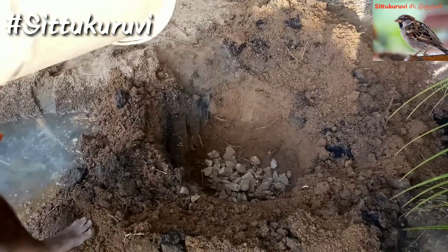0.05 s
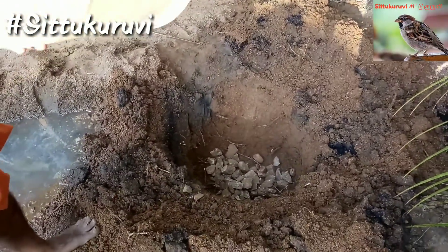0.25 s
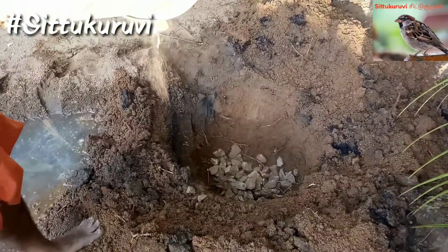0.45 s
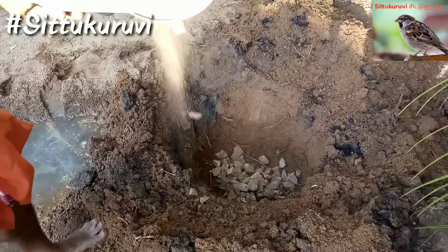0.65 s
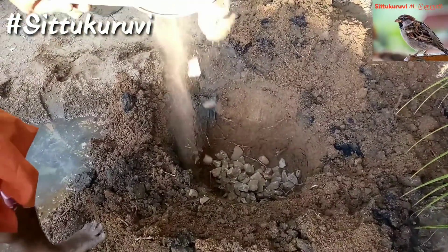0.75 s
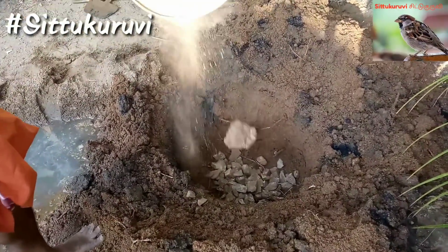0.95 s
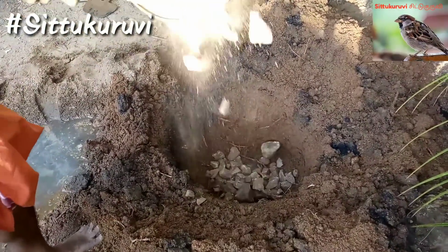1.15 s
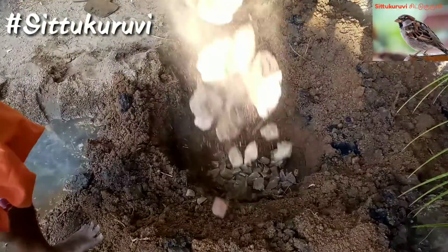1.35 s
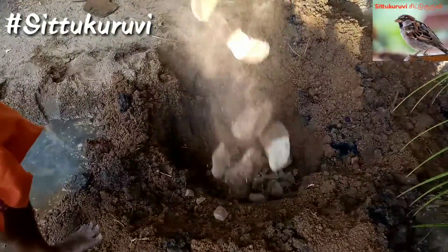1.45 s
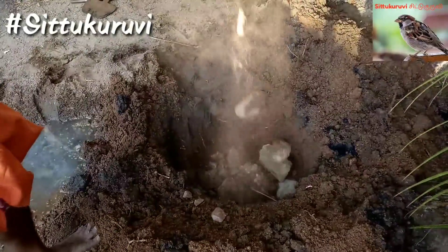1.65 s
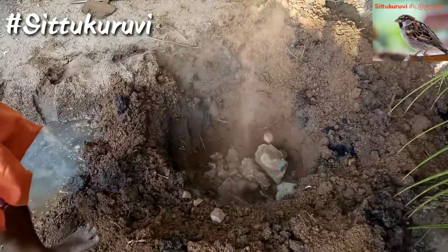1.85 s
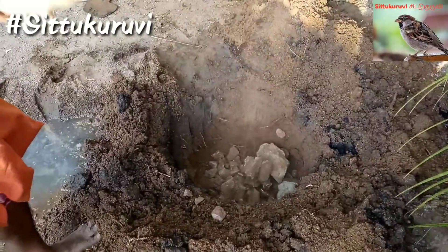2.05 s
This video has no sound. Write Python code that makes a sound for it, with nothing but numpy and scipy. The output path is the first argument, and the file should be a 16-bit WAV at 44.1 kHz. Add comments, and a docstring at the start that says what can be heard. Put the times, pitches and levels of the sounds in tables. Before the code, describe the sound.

Rocks tumble loudly from a hollow plastic tub into an earth pit, ending in settling knocks

```python
"""Under a faint outdoor background, broken stones begin to slip in a tipped plastic tub, with soft scrapes.
They slide out in two surges: random contacts make them clatter, grit crackles as short noise bursts,
and rolling stones rumble. Knocks and thumps are short swelling tones that ring the tub's wall.
The last stones land on a heap in an earth pit with dry clacks, a few thuds, and settle.
Noise that dies away serves as the echo of the pit and the open air."""
import sys
import numpy as np
from scipy import signal
from scipy.fft import rfft, irfft
from scipy.io import wavfile
from scipy.ndimage import uniform_filter1d

SR = 44100
rng = np.random.default_rng(int(sys.argv[2]) if len(sys.argv) > 2 else 0)


def wrap_up_sound(samples):
    """Save the sound to the file named by the first command line argument, as 16-bit audio."""
    columns = np.atleast_2d(samples).T
    # keep every value between -1 and 1, then stretch to whole-number steps
    tamed = np.clip(columns, -1, 1)
    steps = np.round(tamed * 32767).astype(np.int16)
    wavfile.write(sys.argv[1], SR, steps)


N = 92610  # length [samples], 2.1 s

# Tone colour of the background: (frequency [Hz], level per Hz [dB])
OUTDOORS_COLOUR = [(25, -1), (70, 5), (130, 4), (220, -8), (450, 0), (1300, -4), (2500, -14), (5000, -27.5),
                   (8000, -29), (8500, -29), (9000, -31), (16000, -50)]
# Sliding load, levels before the trims below:
# (time [s], clatter level [dB], grit level [dB], rumble level [dB])
SLIDE_LEVELS = [(0.1, -50.5, -84, -39), (0.144, -51.5, -76, -39), (0.222, -32.5, -55, -39.5),
                (0.252, -27, -49, -28.5), (0.306, -30, -51, -29), (0.334, -23.5, -27, -28.5),
                (0.372, -21.5, -41.5, -12.5), (0.392, -28.5, -42, -30), (0.408, -18, -44, -23),
                (0.454, -29, -38.5, -29.5), (0.474, -19, -24, -19), (0.52, -16, -38, -23.5),
                (0.54, -13, -26, -18.5), (0.552, -23, -35, -27.5), (0.61, -16.5, -34, -22),
                (0.878, -32, -52.5, -30.5), (0.894, -22.5, -40, -17), (0.912, -22.5, -34, -25),
                (0.956, -24, -35, -27.5), (1.002, -18.5, -35, -22), (1.298, -18.5, -29, -21),
                (1.32, -26.5, -42.5, -20), (1.352, -19, -26, -27.5), (1.376, -21, -51, -29),
                (1.386, -19, -34.5, -22), (1.5, -27, -38, -34.5), (1.542, -22, -37.5, -35.5),
                (1.58, -42, -60.5, -46)]
# Tones of the tub's plastic wall: (frequency [Hz], time to fall 60 dB [s], relative level [dB])
TUB_MODES = [(235.4, 0.21, -2), (380, 0.13, -8), (678, 0.032, -9), (782, 0.03, -6), (1216, 0.048, 2),
             (1315.5, 0.036, 1.5), (1413, 0.23, -4), (1548, 0.052, -3.5), (1615, 0.041, -1),
             (1770, .06, -10), (2010, 0.02, 2), (2580, 0.052, -5), (2850, 0.07, -32)]
# Tone colours of the three sliding sounds: (frequency [Hz], level per Hz [dB])
CLATTER_COLOUR = [(150, -7), (350, -1.5), (700, 0), (1000, 1.5), (1350, -2), (2050, -2.5), (2600, -7),
                  (3500, -12.5), (7000, -11)]
GRIT_COLOUR = [(1000, -21), (2500, 8.5), (4000, 0.5), (6300, -1), (8500, -9.5), (11000, -11), (14000, -26),
               (16000, -34)]
RUMBLE_COLOUR = [(25, -29), (65, -6), (150, -9), (230, -0.5), (310, -3), (420, 0.5), (700, -7.5),
                 (2000, -46)]
# Big stones striking inside the tub: (time [s], level [dB], pitch [Hz], crack level before trim [dB])
KNOCKS = [(.046, -28.5, 1125, -52), (.050, -29, 705, -45.5), (0.213, -22, 1210, -36), (.253, -18, 720, -50),
          (.318, -21, 1980, -18), (0.336, -14.5, 1230, -12), (.340, -21, 1870, -37), (.406, -8, 1350, -27),
          (0.427, -14, 1380, -20.5), (0.429, -10.5, 1090, -21), (.443, -29, 1800, -22),
          (.467, -15, 1680, -17), (0.479, -6.5, 1560, -11.5), (.490, -12, 1600, -22),
          (0.496, -18, 1560, -13.5), (0.534, -19, 1190, -19), (0.54, -20, 1480, -14),
          (0.595, -8.5, 1680, -9.5), (0.612, -10.5, 1250, -22), (.641, -14, 1700, -10.5),
          (.681, -11.5, 1470, -18), (0.699, -12.5, 1090, -15), (0.728, -12, 608, -26),
          (0.75, -19, 2180, -20.5), (0.774, -33, 1770, -20), (.822, -17.5, 875, -41),
          (.892, -12.5, 1000, -15.5), (0.903, -16, 890, -20.5), (.942, -16.5, 4750, -13.5),
          (.962, -13, 1870, -34), (0.987, -9, 1690, -11.5), (1.005, -8, 740, -31),
          (1.053, -23, 1400, -14.5), (1.081, -17, 1350, -16.5), (1.115, -10, 1290, -39),
          (1.120, -5, 655, -28), (1.151, -7.5, 1380, -13.5), (1.156, -6, 1910, -16),
          (1.222, -20, 1290, -15), (1.253, -14, 1000, -15), (1.264, -13, 1500, -17),
          (1.276, -10.5, 1440, -25), (1.291, -14, 1300, -25), (1.330, -12, 1200, -28),
          (1.346, -20, 1430, -14), (1.379, -15, 1200, -23), (1.393, -9, 1380, -22),
          (1.466, -14.5, 1310, -25), (1.493, -22, 1400, -22), (1.518, -11.5, 1300, -21.5),
          (1.54, -14.5, 1300, -24)]
# Tone colour of the cracks in the tub: (frequency [Hz], level per Hz [dB])
TUB_CRACK_COLOUR = [(80, -38), (400, -9.5), (1200, 8.5), (2300, 10), (2900, 1.5), (3600, -2.5),
                    (6000, -8.5), (9000, -9), (12000, -18.5), (16000, -24)]
# Heavy stones rolling over and thumping the tub's bottom: (time [s], level [dB], pitch [Hz])
THUMPS = [(0.051, -32, 267), (.252, -15.5, 370), (.263, -18, 370), (0.318, -23, 285), (.363, -10, 307),
          (.411, -29, 130), (0.552, -18, 238), (0.563, -22.5, 140), (0.733, -13.5, 403), (0.821, -22, 225),
          (0.903, -14, 332), (1.001, -16.5, 256), (1.078, -17.5, 212), (1.121, -22, 278),
          (1.200, -19.5, 200), (1.275, -21, 220), (1.344, -14.5, 233), (1.357, -19, 234), (1.398, -20, 230)]
# Short scrapes on the plastic as the load starts to slip: (time [s], level [dB])
SCRAPES = [(.121, -30.5), (.148, -30), (.160, -31), (.176, -35.5)]
# Stones landing on the heap:
# (time [s], level [dB], pitch [Hz], swell to the peak [cycles], crack level before trim [dB])
LANDINGS = [(1.5875, -15, 1330, 1.2, -13.5), (1.59, -21, 1330, 2.4, -15.5), (1.637, -19.5, 1280, 3, -26),
            (1.643, -12, 1330, 1, -29), (1.644, -19.5, 484, 1.16, -30), (1.651, -27, 1100, 1.6, -22),
            (1.666, -13.5, 1213, 1.7, -20.5), (1.681, -7, 1150, 0.8, -26), (1.682, -17.5, 830, 1.5, -30),
            (1.692, -13, 1210, 1.4, -25.5), (1.701, -15, 890, 0.79, -26), (1.707, -19, 1330, 0.69, -21.5),
            (1.716, -12.5, 880, 0.53, -29), (1.742, -8.5, 960, 0.51, -46), (1.747, -14, 530, 0.68, -37),
            (1.756, -16, 640, 0.5, -42), (1.794, -25, 1050, 0.59, -47), (1.8227, -4.5, 702, 0.97, -31),
            (1.827, -19, 810, 1.2, -41), (1.838, -42, 756, 0.81, -36), (1.864, -52, 3800, 2.3, -43),
            (1.9026, -16.5, 833, 0.7, -27.5), (1.981, -16.5, 940, 0.65, -62),
            (2.0137, -21, 1490, 1.95, -38), (2.034, -18.5, 1150, 0.92, -30.5)]
# Tone colour of the cracks on the heap: (frequency [Hz], level per Hz [dB])
HEAP_CRACK_COLOUR = [(300, -8.5), (1400, 8.5), (1900, 11), (2350, -2), (3200, 1.5), (4400, -2.5),
                     (5500, -11), (7500, -11.5), (8600, -23), (9800, -14), (12500, -34), (16000, -40)]
# Dull thuds of the earth under some landings: (time [s], level [dB])
THUDS = [(1.643, -22), (1.715, -23.5), (1.746, -41), (1.825, -49)]

# T60 is the time a sound takes to fall by 60 dB; CYCLES is the time to the peak of a blow.
OUTDOORS_DB = -51
CLATTER_TRIM_DB, GRIT_TRIM_DB, RUMBLE_TRIM_DB = 0.5, 0.5, -4
ONSET_DB_PER_S, RUN_OUT_DB_PER_S = 32, 83  # slopes before the first and after the last table row
CONTACTS_PER_S = 1600  # nominal; the random gaps come out slightly shorter
CONTACT_SCATTER_DB, CONTACT_CYCLES = 3, 0.92
STONE_HZ, STONE_SPREAD_OCT = 1382, 0.61  # pitch of a middling stone; smaller stones sound higher
GRIT_PER_S, GRIT_SCATTER_DB, GRIT_T60_S = 1500, 6, 0.015
ROLLS_PER_S, ROLL_T60_S = 170, 0.03
CLATTER_RING_DB, KNOCK_RING_DB, THUMP_RING_DB = -7.5, -3.5, -4  # ringing of the tub's wall
KNOCK_CYCLES, THUMP_CYCLES = 1.03, 1
SCRAPE_HZ, SCRAPE_CYCLES = 570, 1.25
SWELL_POWER = 2.37  # steepness of a blow's rise and fall
CRACK_T60_S = 0.024
TRICKLE_DB, TRICKLE_T60_S = -22.5, 0.15  # chips that skitter after a blow
HEAP_HZ, HEAP_CYCLES, HEAP_DB = 428, 2.1, -19.5  # give of the heap; level relative to the landing
EARTH_HZ, EARTH_CYCLES = 155, 0.45
PIT_T60_S, PIT_DB, AIR_T60_S, AIR_DB = 0.057, -10, 0.26, -21.5
LOW_CUT_HZ, TOP_HZ = 104, 15600


def undb(db):
    """Turn decibels into a plain multiplier of the sound's height."""
    return 10 ** (np.asarray(db) / 20)


def unit(x):
    """Scale to an energy of one."""
    return x / np.sqrt(np.sum(x ** 2))


def through(x, response):
    """Let every sample of a sound set off the given response, and add them all up."""
    return signal.fftconvolve(x, response)[:N]


def add(out, start, sound):
    """Mix a sound in at its start time."""
    i = max(int(start * SR), 0)
    out[i:i + len(sound)] += sound[:max(N - i, 0)]


def colour(x, points):
    """Shape the balance of low and high tones, without echo ahead of a sound; white noise keeps its power."""
    hz, db = np.array(points).T
    size = 4096
    f = np.maximum(np.arange(size // 2 + 1) * SR / size, 1)
    level_db = np.interp(np.log(f), np.log(hz), db)
    # folding the cepstrum makes the filter respond only after its input
    cepstrum = irfft(np.log(undb(level_db)))
    cepstrum[1:size // 2] *= 2
    cepstrum[size // 2 + 1:] = 0
    response = irfft(np.exp(rfft(cepstrum)))
    return through(x, unit(response))


def fade(t60):
    """Steady decay from 1 that falls 60 dB in t60 seconds, cut off after half a second."""
    return undb(-60 * np.arange(SR // 2) / SR / t60)


def outdoors():
    """Faint background: steady noise with its own tone colour."""
    return undb(OUTDOORS_DB) * colour(rng.standard_normal(N), OUTDOORS_COLOUR)


def blow(hz, cycles):
    """One stone jolted by a contact: a few cycles that swell quickly and die away."""
    turns = hz * np.arange(int(8 * cycles / hz * SR)) / SR
    swell = (turns / cycles * np.exp(1 - turns / cycles)) ** SWELL_POWER  # peak of 1
    return swell * np.sin(2 * np.pi * turns)


def tub(ring_db):
    """Response of the tub at one random spot: the direct blow, then the dying tones of the wall."""
    t = np.arange(SR // 2) / SR
    phases = rng.uniform(-np.pi / 2, np.pi / 2, len(TUB_MODES))
    ring = np.zeros(len(t))
    for (hz, t60, db), phase in zip(TUB_MODES, phases):
        # dividing by t60 makes short tones start louder
        ring += undb(db) * fade(t60) / t60 * np.cos(2 * np.pi * hz * t + phase)
    response = undb(ring_db) * 45 / SR * ring
    response[0] += 1  # the direct blow
    return response


def contacts(per_s, scatter_db):
    """Random clicks of uneven size."""
    happens = rng.random(N) < per_s / SR
    return happens * undb(scatter_db * np.clip(rng.standard_normal(N), -2, 2))


def crackle(clicks, t60):
    """Each click sets off its own short burst of noise."""
    power = np.abs(through(clicks ** 2, fade(t60) ** 2))
    return rng.standard_normal(N) * np.sqrt(power)


def follow(x, db):
    """Even out a stream of contacts, then give it the level of the sliding load, with soft ends."""
    t, times = np.arange(N) / SR, np.array(SLIDE_LEVELS)[:, 0]
    power = uniform_filter1d(uniform_filter1d(x ** 2, size=900), size=900)
    power = power + 0.025 * np.mean(x ** 2)  # keeps quiet gaps from being blown up
    before_db = ONSET_DB_PER_S * np.maximum(times[0] - t, 0)
    after_db = RUN_OUT_DB_PER_S * np.maximum(t - times[-1], 0)
    return x / np.sqrt(power) * undb(np.interp(t, times, db) - before_db - after_db)


def jostling(spots=6):
    """Stones of many sizes knock together at several spots of the tub and ring its wall."""
    tracks = np.zeros((spots, N))
    draws = np.clip(rng.standard_normal((4000, 3)), -2, 2)
    starts = np.cumsum(draws[:, 0] ** 2) / CONTACTS_PER_S
    for k, (start, (_, size, force)) in enumerate(zip(starts[starts < N / SR], draws)):
        hz = STONE_HZ * 2 ** (-STONE_SPREAD_OCT * size)
        # high blows are shorter, so they are raised to carry as much energy
        level = undb(CONTACT_SCATTER_DB * force) * np.sqrt(hz / STONE_HZ)
        add(tracks[k % spots], start, level * blow(hz, CONTACT_CYCLES))
    return sum(through(track, tub(CLATTER_RING_DB)) for track in tracks)


def grit_bursts():
    """Tiny chips knock at random, each with a very short burst of noise."""
    return crackle(contacts(GRIT_PER_S, GRIT_SCATTER_DB), GRIT_T60_S)


def rolling():
    """Rolling stones bump the tub with random short noise bursts and ring it."""
    bumps = crackle(contacts(ROLLS_PER_S, CONTACT_SCATTER_DB), ROLL_T60_S)
    return through(bumps, tub(THUMP_RING_DB))


def sliding_load():
    """The stones clatter, grit crackles, and rolling makes the bottom of the tub rumble."""
    _, clatter_db, grit_db, rumble_db = np.array(SLIDE_LEVELS).T
    grit = follow(colour(grit_bursts(), GRIT_COLOUR), grit_db + GRIT_TRIM_DB)
    rumble = follow(colour(rolling(), RUMBLE_COLOUR), rumble_db + RUMBLE_TRIM_DB)
    clatter = follow(colour(jostling(), CLATTER_COLOUR), clatter_db + CLATTER_TRIM_DB)
    return clatter + grit + rumble


def cracks(table, points, trim_db):
    """The bright snap of stone edges meeting at each blow, and the chips that skitter after it."""
    clicks = np.zeros(N)
    for start, *_, db in table:
        add(clicks, start, undb([db + trim_db]))
    chips = grit_bursts()
    trickle = undb(TRICKLE_DB) * chips / np.std(chips) * through(clicks, fade(TRICKLE_T60_S))
    snaps = crackle(clicks, CRACK_T60_S)
    return colour(snaps + trickle, points)


def tub_blows():
    """Hard knocks, soft heavy thumps and the first scrapes all make the tub's wall ring."""
    hard, soft = np.zeros((2, N))
    for start, db, hz, _ in KNOCKS:
        add(hard, start, undb(db) * blow(hz, KNOCK_CYCLES))
    for start, db, hz in THUMPS:
        add(soft, start, undb(db) * blow(hz, THUMP_CYCLES))
    for start, db in SCRAPES:
        add(hard, start, undb(db) * blow(SCRAPE_HZ, SCRAPE_CYCLES))
    ringing = through(hard, tub(KNOCK_RING_DB)) + through(soft, tub(THUMP_RING_DB))
    return ringing + cracks(KNOCKS, TUB_CRACK_COLOUR, trim_db=-0.5)


def landings():
    """Dry clacks on the loose heap, which gives a little each time; under some the earth thuds."""
    out = np.zeros(N)
    for start, db, hz, cycles, _ in LANDINGS:
        add(out, start, undb(db) * blow(hz, cycles))
        add(out, start, undb(db + HEAP_DB) * blow(HEAP_HZ, HEAP_CYCLES))
    for start, db in THUDS:
        add(out, start, undb(db) * blow(EARTH_HZ, EARTH_CYCLES))
    return out + cracks(LANDINGS, HEAP_CRACK_COLOUR, trim_db=0.5)


def burst(t60):
    """Noise that dies away."""
    return rng.standard_normal(SR // 2) * fade(t60)


def pit_and_air_echo(stones):
    """Many faint echoes: a short, stronger tail from the pit and a longer, weaker one from the open air."""
    pit = undb(PIT_DB) * unit(burst(PIT_T60_S))
    air = undb(AIR_DB) * unit(burst(AIR_T60_S))
    return through(stones, pit + air)


def scene():
    """Add up the stones, their echo and the background, as one channel."""
    stones = sliding_load() + tub_blows() + landings()
    return (stones + pit_and_air_echo(stones) + outdoors())[None]


def record(dry):
    """The recorder thins the deep bass, rounds the highest peaks and cuts the top."""
    ceiling = 0.7
    low_cut = signal.butter(2, LOW_CUT_HZ, "high", fs=SR, output="sos")
    thinned = signal.sosfilt(low_cut, dry)
    rounded = thinned / (1 + (thinned / ceiling) ** 6) ** (1 / 6)
    top_cut = signal.ellip(8, 0.2, 70, TOP_HZ, fs=SR, output="sos")
    return signal.sosfilt(top_cut, rounded)


dry = scene()
out = record(dry)
wrap_up_sound(out)
```